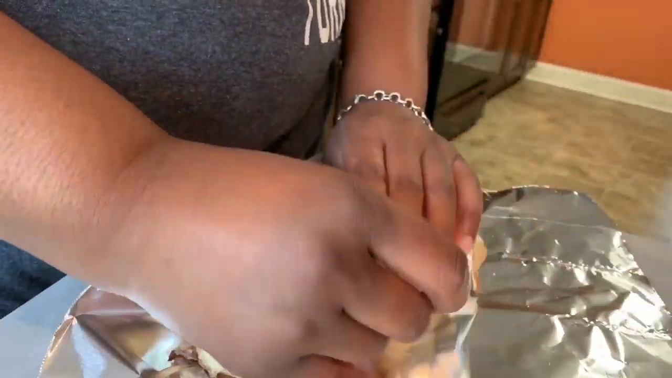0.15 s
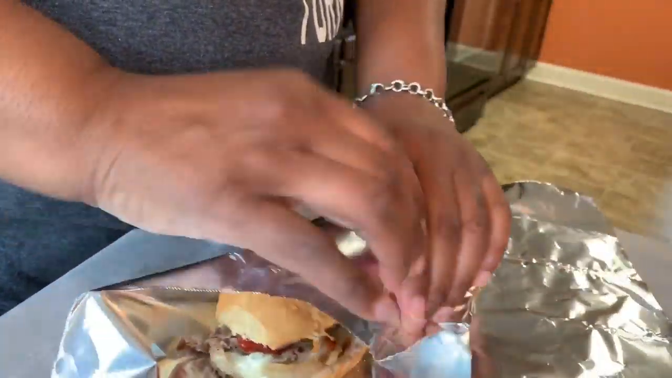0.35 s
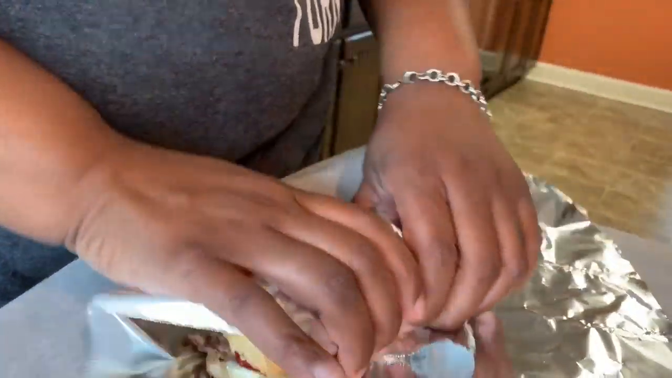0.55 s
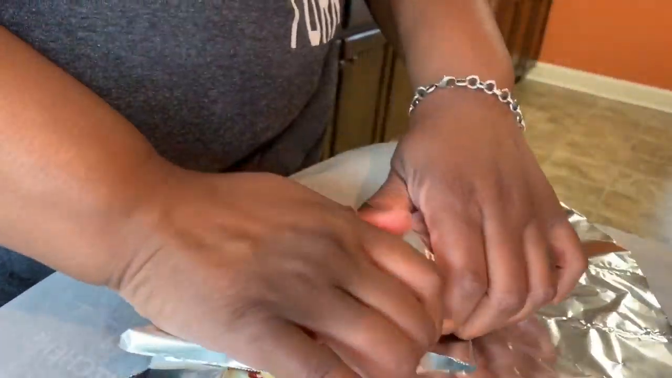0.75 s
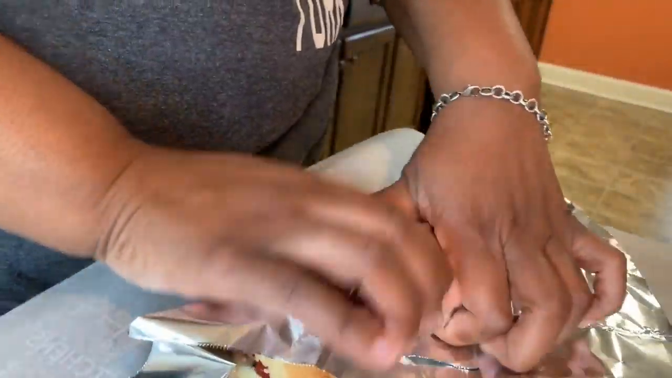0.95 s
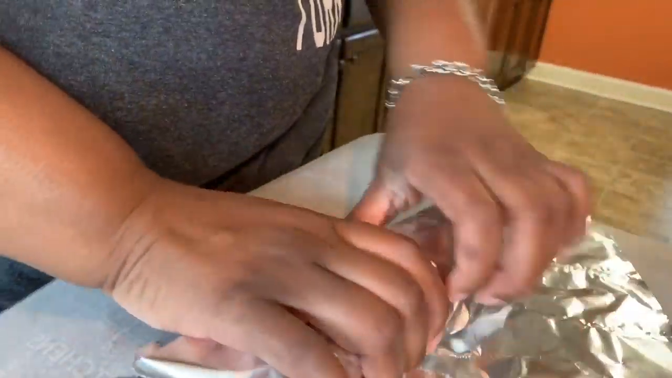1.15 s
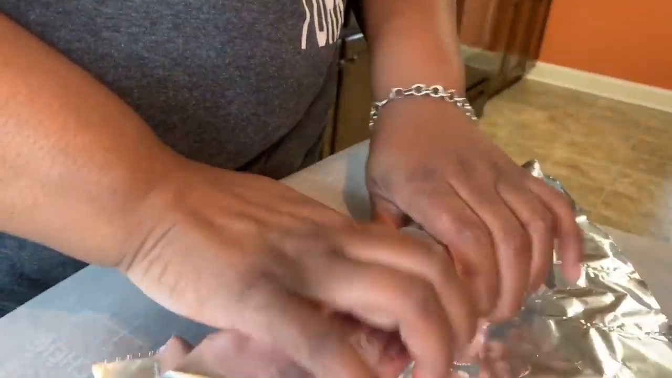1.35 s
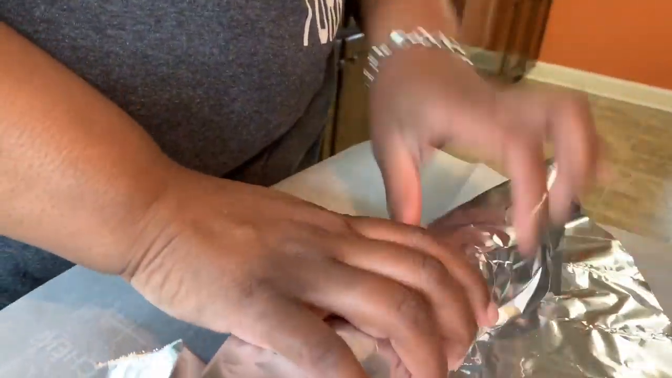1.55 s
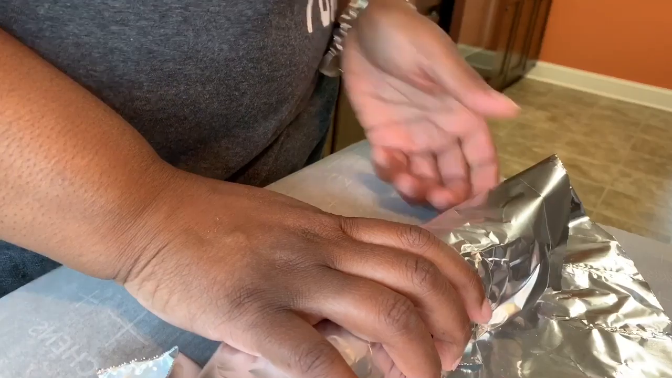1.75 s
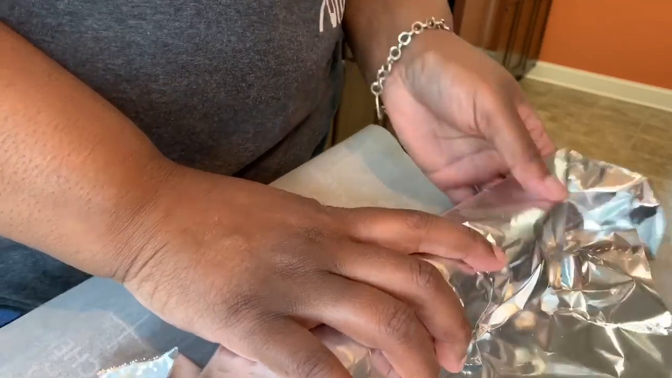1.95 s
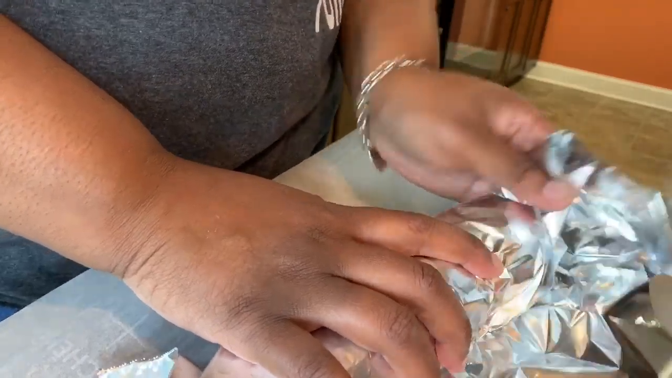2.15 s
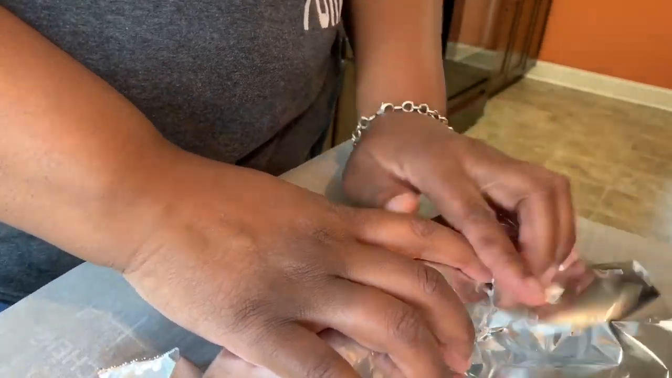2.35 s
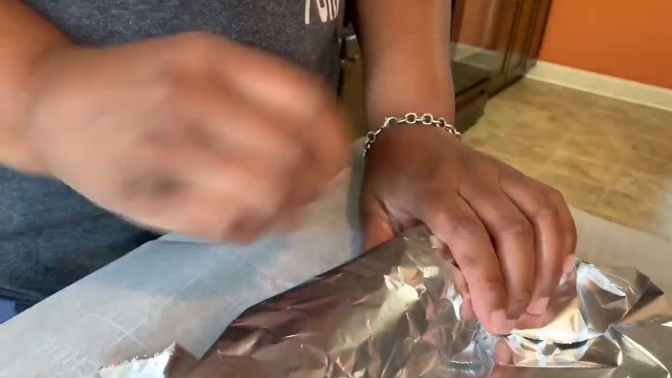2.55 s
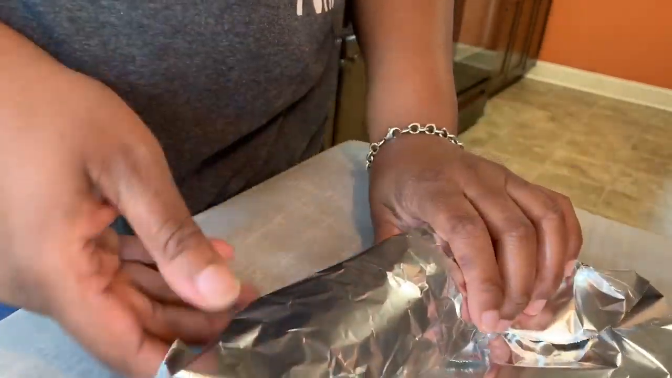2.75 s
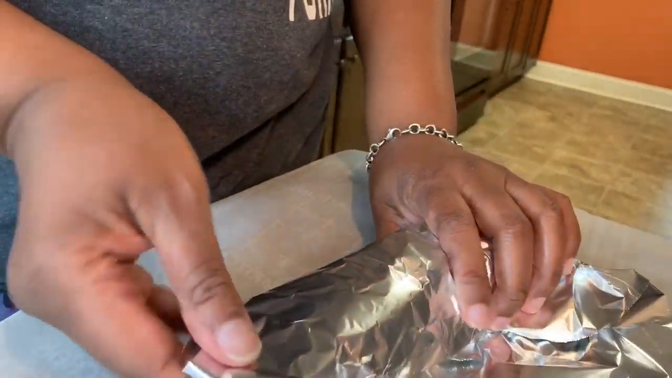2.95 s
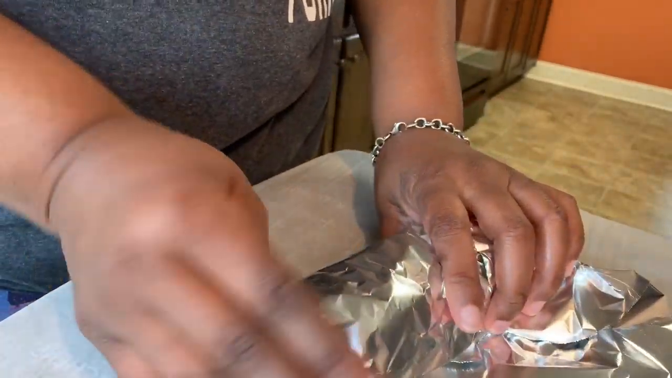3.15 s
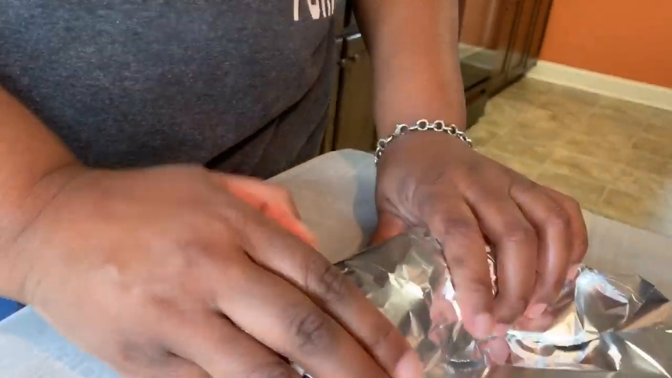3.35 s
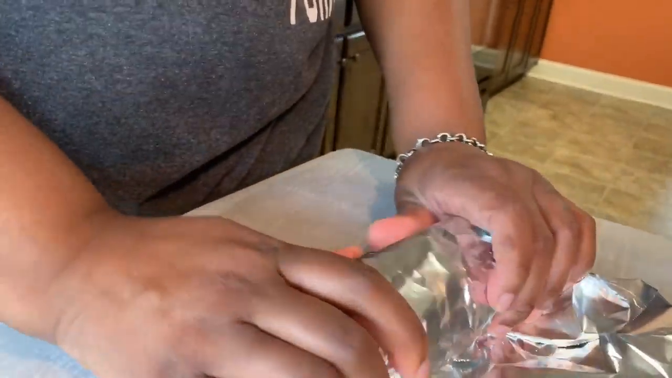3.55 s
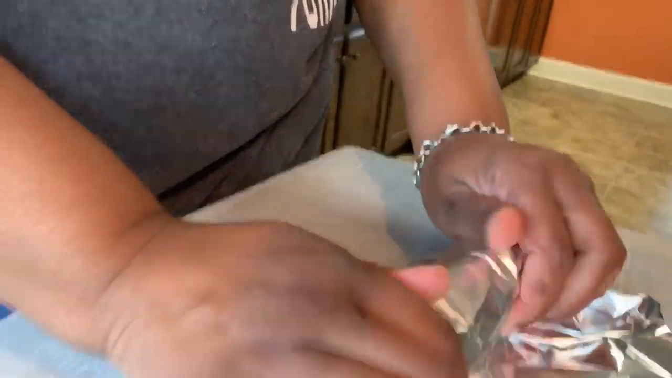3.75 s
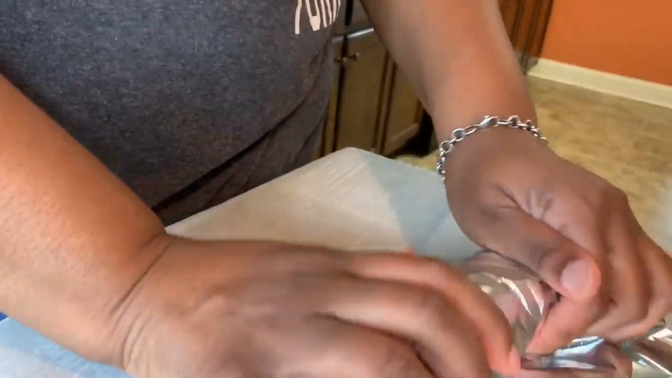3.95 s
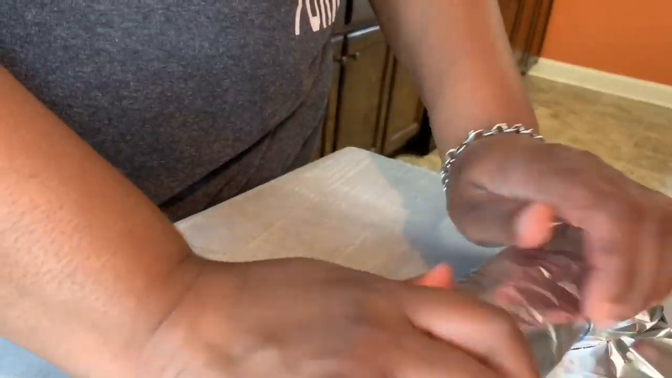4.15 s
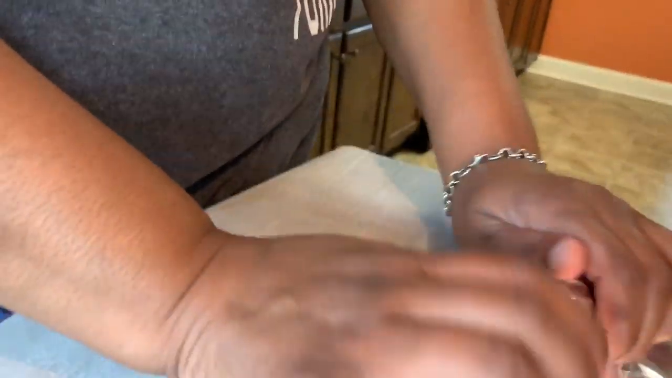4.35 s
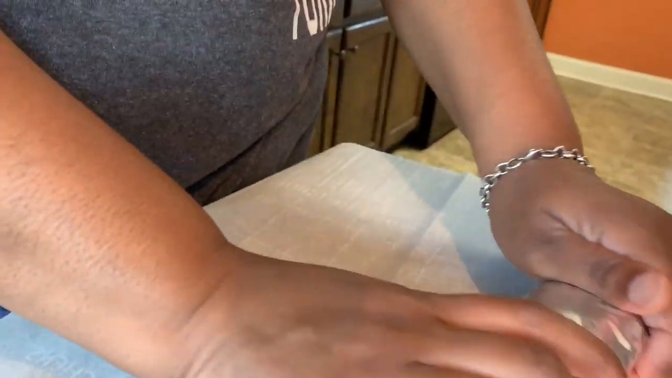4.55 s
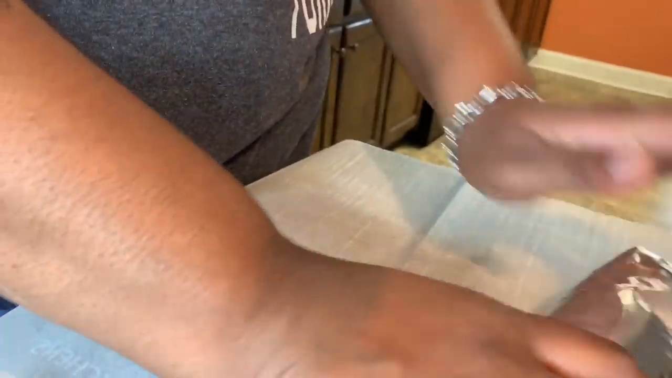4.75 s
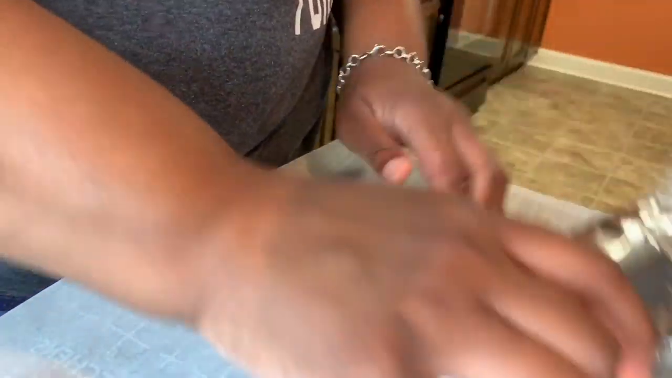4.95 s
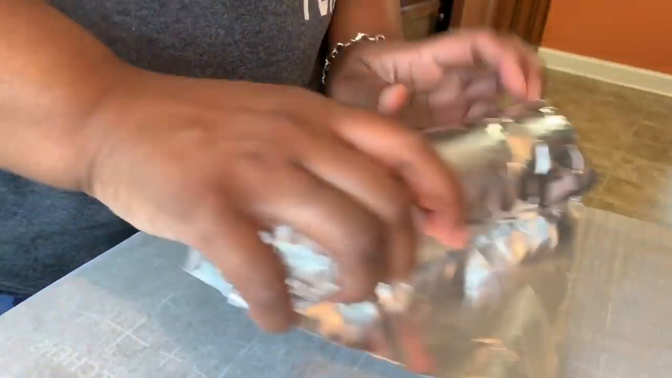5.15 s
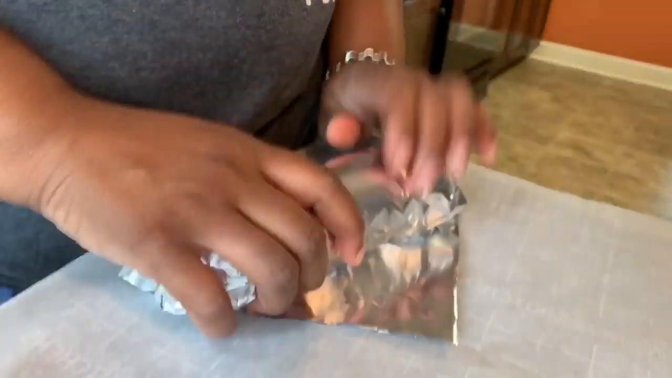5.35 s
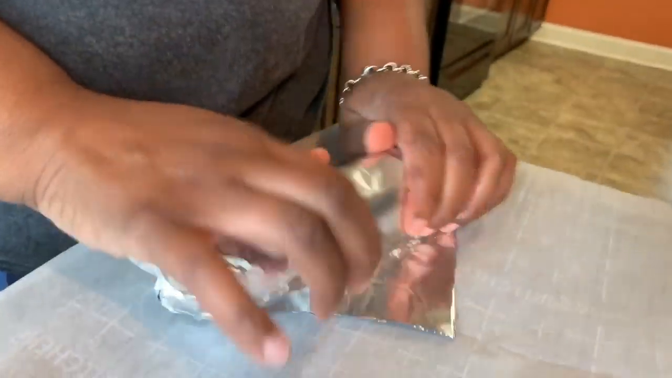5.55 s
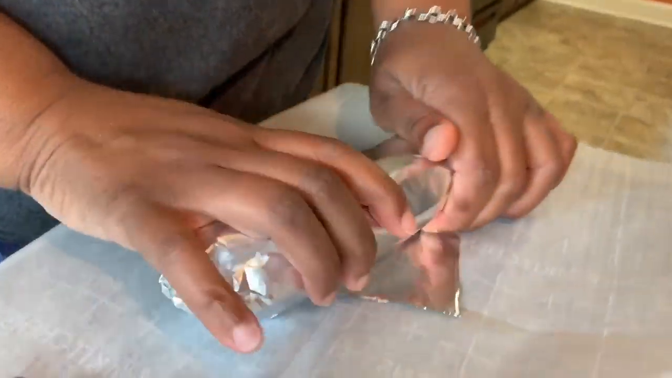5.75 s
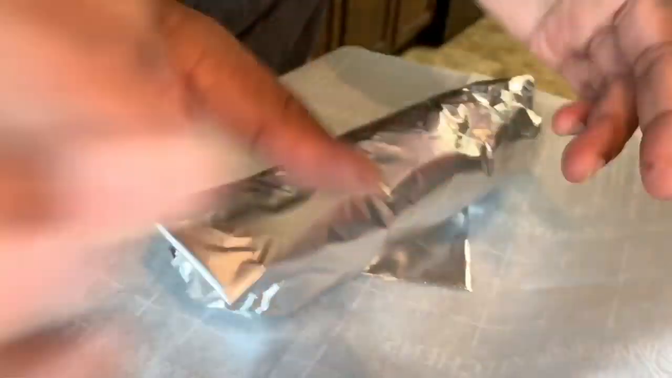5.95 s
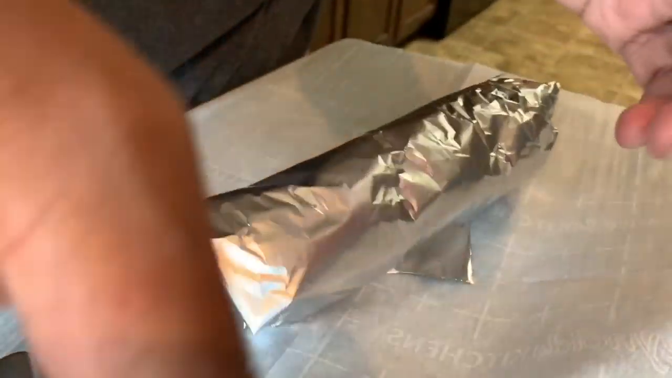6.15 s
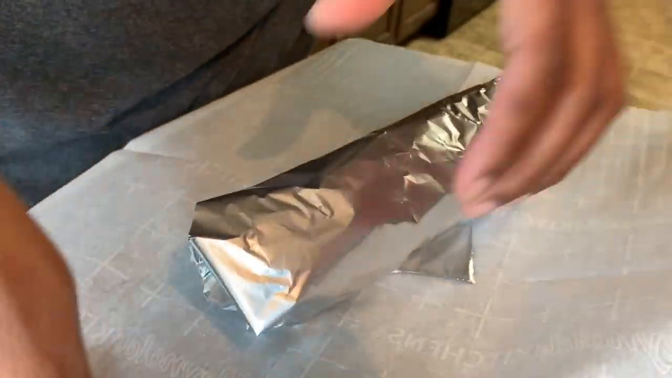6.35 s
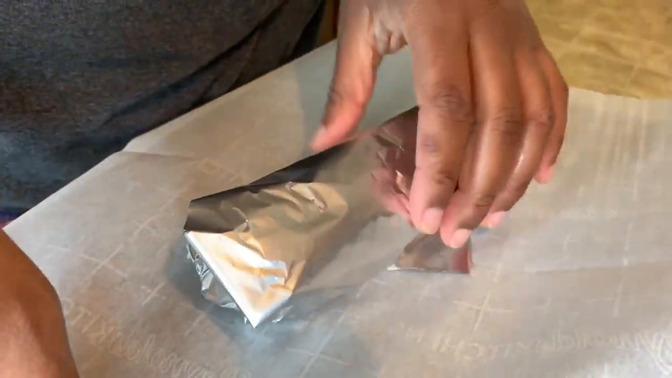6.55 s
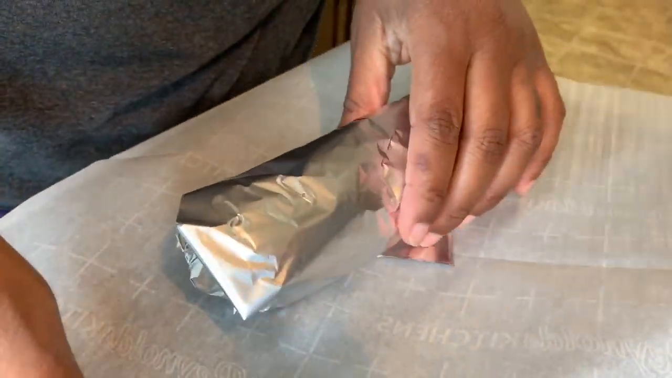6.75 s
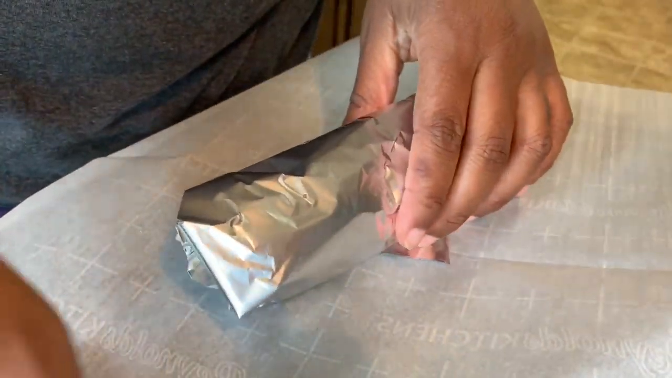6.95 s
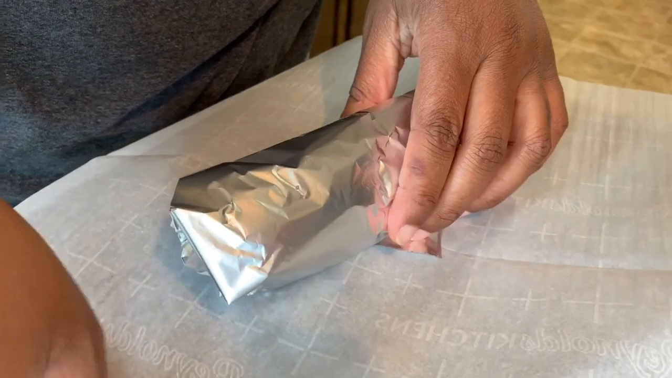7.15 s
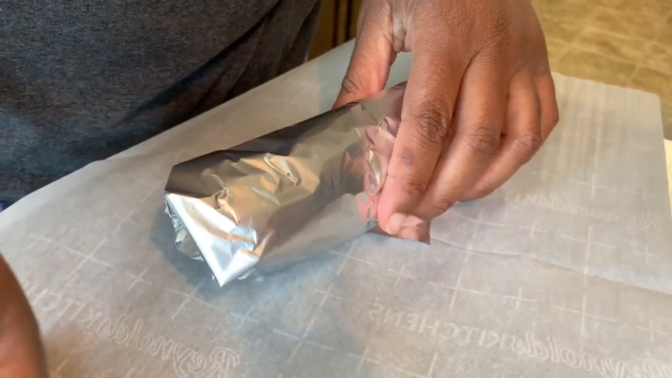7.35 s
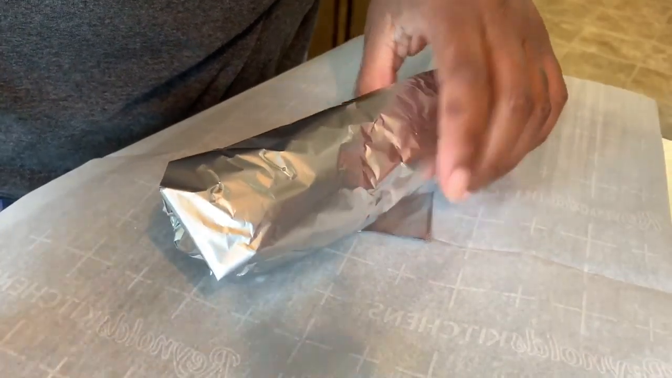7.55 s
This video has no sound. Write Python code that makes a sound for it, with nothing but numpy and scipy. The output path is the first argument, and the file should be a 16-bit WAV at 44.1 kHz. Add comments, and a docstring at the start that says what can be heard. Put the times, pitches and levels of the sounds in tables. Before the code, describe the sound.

Hands fold and press thin aluminium foil around a sandwich on a kitchen counter, heard very close. Dense, bright crackle comes in quick squeezes with sharp snaps and lower pops, plus faint soft bumps. After about six seconds it thins to small ticks, then a wooden knock and rub. A faint appliance hum lies beneath.

```python
"""A kitchen counter in a quiet room: hands fold and press thin metal foil round a sandwich, close to a phone.
Noise bursts ring small patches of foil as snaps and low pops, over a clumped crackle of tiny creases.
The parcel bumps the counter in short low waves, and near the end a wooden panel is rubbed and knocked,
its ringing tones driven by noise. An appliance hums, still air is shaped noise, and the kitchen echoes."""
import sys
import numpy as np
from scipy import signal
from scipy.fft import rfft, irfft
from scipy.io import wavfile
from scipy.ndimage import uniform_filter1d

SR = 44100
rng = np.random.default_rng(int(sys.argv[2]) if len(sys.argv) > 2 else 0)


def volts_from_db(level):
    """Convert decibel levels to linear amplitude ratios."""
    exponent = np.asarray(level, float) / 20
    return 10 ** exponent


def master(y):
    """Save y as 16-bit WAV."""
    cut = np.clip(np.atleast_2d(y).T, -1, 1)
    pcm = np.round(cut * 32767)  # scale
    wavfile.write(sys.argv[1], SR, pcm.astype(np.int16))


N = 334727  # length in samples


def evened(x):
    """Scales a sound to an rms of 1."""
    return x / np.sqrt(np.mean(x ** 2) + 1e-20)


def read(points, hz):
    """Reads a table between its points, on a log-frequency axis."""
    table_hz, value = np.transpose(points)
    return np.interp(np.log(hz + 1), np.log(table_hz + 1), value)


def add(mix, s, sound):
    """Lays a sound into the mix at time s, cutting it at the end of the mix."""
    part = mix[round(s * SR):][:len(sound)]
    part += sound[:len(part)]


def coloured(x, points):
    """Gives a sound the listed spectrum, with a filter that never sounds ahead of its input."""
    hz = abs(np.fft.fftfreq(4096, 1 / SR))
    log_gain = np.log(volts_from_db(read(points, hz)))
    # the Hilbert transform finds the phase that puts the response as early as possible
    spectrum = np.exp(np.conj(signal.hilbert(log_gain)))
    taps = np.fft.ifft(spectrum).real[:2048]
    return signal.oaconvolve(x, taps)[:len(x)]


def ring(x, hz, width):
    """A two-pole resonance of peak gain 1; a narrower width [Hz] rings longer."""
    r = np.exp(-np.pi * width / SR)
    poles = [1, -2 * r * np.cos(2 * np.pi * hz / SR), r * r]
    return (1 - r * r) / 2 * signal.lfilter([1, 0, -1], poles, x)


def above(x, edge_hz):
    """The part of x over a soft edge about an octave wide; the rest is x minus this."""
    hz = np.fft.rfftfreq(len(x), 1 / SR)
    return irfft(rfft(x) / (1 + (edge_hz / (hz + 1)) ** 6), len(x))


def room_tone():
    """Still air is noise with a fixed colour; the wavering hum is noise through narrow resonances."""
    # colour of the still air: (frequency [Hz], relative level per Hz [dB])
    air_colour = [(18, -46), (30, -3.5), (250, 1), (382, -4.5), (600, -17), (1000, -19), (2400, -36),
                  (4800, -25), (8300, -29), (15800, -38)]
    # tones of the appliance: (frequency [Hz], width [Hz], level [dB])
    hum_tones = [(187.3, 3.4, -60), (134.7, 20, -64), (299, 9.1, -71)]
    air = volts_from_db(-56.5) * evened(coloured(rng.standard_normal(N), air_colour))
    hum = sum(volts_from_db(db) * evened(ring(rng.standard_normal(N), hz, width)) for hz, width, db in hum_tones)
    return air + hum


def effort():
    """Crumpling strength over time, for middle, large and smallest facets; powers of all squeezes add up."""
    # foil settling between squeezes:
    # (time [s], level [dB], large facets over it [dB], smallest facets over it [dB])
    settling = [(0, -36, -1.5, -11), (.45, -41, 1.5, -10), (1.2, -39.5, 1.5, -7), (1.66, -35.5, -4.5, -10),
                (1.77, -47.5, -2, -5), (2.0, -35, 1.5, -8), (2.7, -37.5, -5.5, -10), (3.4, -38.5, -4, -12),
                (4.9, -38, -4.5, -12), (5.06, -56, -4, -16), (5.13, -54, -3, -16), (5.3, -53, -4, -12),
                (5.9, -46, -2, -10), (6.1, -51.5, 0, -14), (6.25, -53.5, 1, -10), (6.4, -66.5, -1, -14),
                (6.55, -49.5, -3, -2), (6.8, -51, -2, -17), (6.97, -52, 2.5, -16), (7.05, -58, 2.5, -16),
                (7.3, -49, 2.5, -18), (7.59, -53, -4, -12)]
    # squeezes of the hands:
    # (time [s], hold [s], level [dB], large facets over it [dB], smallest facets over it [dB])
    squeezes = [(0, 0.015, -35, -10, -10), (0.084, 0.087, -27, -2.5, -2), (0.183, 0.04, -34, -0.5, -7),
                (0.233, 0.053, -22.5, -7, -2), (0.316, 0.061, -32.5, -9, -6), (0.391, 0.026, -29, -7, -10),
                (0.469, 0.033, -27.5, -9, -1), (0.536, 0.075, -24.5, -7.5, -5),
                (0.606, 0.13, -29.5, -8, -7), (0.743, 0.056, -31, -8, -8), (0.83, 0.071, -34.5, -5.5, -12),
                (0.905, 0.11, -30.5, -13, -6), (1.025, 0.038, -28, -21, -7), (1.072, 0.035, -26, -16, -9),
                (1.15, 0.054, -25, -17, -6), (1.246, 0.041, -29, -3.5, -7), (1.303, 0.043, -32, -8, -9),
                (1.369, 0.091, -30, -8, -8), (1.577, 0.085, -37, -6.5, -4), (1.784, 0.038, -37, 4, -13),
                (1.839, 0.092, -25.5, -7.5, -5), (1.977, 0.062, -34, -4.5, -9), (2.037, 0.1, -22, -9, -11),
                (2.167, 0.11, -23.5, -3, -4), (2.267, 0.096, -21, -11, -7), (2.402, 0.085, -22.5, -14, -11),
                (2.488, 0.14, -29.5, -12.5, -16), (2.736, 0.061, -32, -13, -7),
                (2.804, 0.095, -26.5, -10.5, -6), (2.898, 0.087, -20.5, -16.5, -10),
                (2.992, 0.063, -29.5, -8, -3), (3.09, 0.057, -30, -8.5, -7), (3.165, 0.11, -20, -16, -11),
                (3.29, 0.035, -20.5, -14, -8), (3.421, 0.084, -21.5, -16.5, -8),
                (3.502, 0.098, -25.5, -7.5, -9), (3.628, 0.11, -23.5, -11, -8),
                (3.731, 0.047, -19, -16.5, -1), (3.797, 0.042, -25.5, -9, -14),
                (3.851, 0.13, -24.5, -13.5, -5), (4.005, 0.057, -24.5, -12, -6),
                (4.062, 0.088, -22, -13, -11), (4.211, 0.14, -24.5, -9.5, -11),
                (4.385, 0.06, -27, -7.5, -3), (4.453, 0.05, -25, -5, -8), (4.534, 0.14, -27, -6, -7),
                (4.708, 0.065, -32, -8, -5), (4.807, 0.11, -32, -11, -9), (4.882, 0.1, -30, -25, -13),
                (4.983, 0.026, -31.5, -1.5, -20), (5.14, 0.048, -24, -13, -8),
                (5.208, 0.053, -35.5, -13, -8), (5.311, 0.028, -24, -8, -9), (5.344, 0.026, -21, -7.5, 1),
                (5.42, 0.065, -32, -1.5, -3), (5.499, 0.11, -33, -5.5, -2), (5.594, 0.11, -33.5, -6.5, -7),
                (5.674, 0.08, -27.5, -4, -11), (5.8, 0.07, -30, -4, -7), (5.892, 0.027, -42.5, 2.5, -11),
                (6.595, 0.062, -40, 3.5, -8), (6.653, 0.047, -34, -2.5, -19), (6.734, 0.027, -43, -1, -9),
                (7.073, 0.018, -53, 10, -16), (7.117, 0.045, -41.5, -4, -11), (7.206, 0.049, -39, -7, -19),
                (7.3, 0.038, -41, -3.5, -13), (7.435, 0.041, -45, 2, -8)]
    # the foil springs back: fall of (middle, large, smallest) facets [dB per s]
    falls = [290, 257, 400]
    grip_s = 0.021  # a squeeze closes quickly
    t = np.arange(N) / SR
    s, db, large_db, tiny_db = np.transpose(settling)
    levels = (db, db + large_db, db + tiny_db)
    power = np.array([volts_from_db(2 * np.interp(t, s, level_db)) for level_db in levels])
    for start, hold, db, large_db, tiny_db in squeezes:
        u = np.arange(0, hold + 0.3, 1 / SR)
        closing = np.minimum(u / grip_s, 1) ** 2
        since_release = np.maximum(u - hold, 0)
        for part, part_db, fall in zip(power, (db, db + large_db, db + tiny_db), falls):
            add(part, start, closing * volts_from_db(2 * (part_db - fall * since_release)))
    return np.sqrt(power)


def crackle():
    """Thousands of tiny creases a second, in clumps that swell and die away."""
    # colour of the crackle: (frequency [Hz], relative level per Hz [dB])
    foil_colour = [(120, -13), (250, -2), (500, 0), (900, -2), (1500, 0), (2500, 0.5), (4000, 1),
                   (5500, 1.5), (8300, -1.5), (11000, -5.5), (15500, -2)]
    starts = (rng.random(N) < 90 / SR) * volts_from_db(5.2 * np.minimum(rng.exponential(1, N), 4))
    # one buckle sets off its neighbours
    spread = signal.lfilter([1], [1, -np.exp(-1 / (0.0025 * SR))], starts)
    clumps = 2.3 + uniform_filter1d(spread, 120)
    sizes = volts_from_db(2.2 * np.minimum(rng.exponential(1, N), 5)) * (rng.random(N) < 5000 / SR) * clumps
    kind, out = rng.integers(0, 10, N), np.zeros(N)
    for k, hz in enumerate(np.geomspace(900, 13000, num=10)):
        envelope = signal.lfilter([1], [1, -np.exp(-1 / (0.0015 * SR))], sizes * (kind == k))
        rattle = rng.standard_normal(N) * envelope
        out += rattle + volts_from_db(6.5) * ring(rattle, hz, 0.81 * hz)  # each size of facet favours its own pitch
    out = coloured(out, foil_colour)
    out /= np.sqrt(uniform_filter1d(out ** 2, 9000) + 1e-12)  # the hand's effort sets the slow level
    # the smaller the facet, the higher its part of the sound
    smallest, upper = above(out, 11700), above(out, 3970)
    bands = [evened(upper - smallest), evened(out - upper), evened(smallest)]
    return (effort() * bands).sum(0)


def kitchen(x):
    """Sparse echoes of random sign, each band dying at its own speed; moving hands keep changing the paths."""
    # echo decay: (frequency [Hz], time to fall by 60 dB [s])
    echo_decay = [(300, 1), (1500, 0.29), (5000, 0.13), (14000, 0.24)]
    out, turn = np.zeros(N), np.arange(N) / SR * 8.2  # radians
    at = np.arange(80, SR // 2 - 20, 20)
    for k in range(3):  # three echo patterns, faded in and out against each other
        taps = np.zeros(SR // 2)
        taps[at + rng.integers(0, 20, len(at))] = rng.choice([-1., 1.], len(at))
        hz, t, bands = signal.stft(taps, SR, nperseg=256)
        fading = volts_from_db(-60 * t / read(echo_decay, hz)[:, None])
        tail = signal.istft(bands * fading, SR, nperseg=256)[1]
        share = np.sqrt(2 / 3) * np.cos(turn + k * np.pi / 3)
        out += signal.fftconvolve(x * share, tail / np.linalg.norm(tail))[:N]
    return out


def facet(noise, hz, edge_db, t60, damping):
    """One crease flips: a dying rattle that rings the facet, with a broad sharp edge; its peak is 1."""
    flip_db, flip_s = 5, 0.0001  # the first flip: height over the rattle, time to its peak
    t = np.arange(len(noise)) / SR
    rattle = noise * (1 - np.exp(-t / 0.000077)) * volts_from_db(-60 * t / t60)
    rattle = rattle + volts_from_db(flip_db) * np.e * t / flip_s * np.exp(-t / flip_s)
    body = ring(ring(rattle, hz, damping * hz), hz, 3.0 * damping * hz)  # twice, for steep skirts
    edge = ring(rattle, 3100, 18000)  # the sheet radiates best in the lower treble
    sound = body / abs(body).max() + volts_from_db(edge_db) * edge / abs(edge).max()
    return sound / abs(sound).max()


def snaps():
    """The creases that stand out: each buckles suddenly and rings its own facet."""
    # buckling creases:
    # (time [s], level [dB], ring of the facet [Hz], sharp edge over the ring [dB], rattle's 60 dB fall [s])
    creases = [(0.0182, -15.5, 2040, 2, 0.028), (0.1214, -9, 4500, 5, 0.07), (0.2327, -14, 7340, 7, 0.0318),
               (0.2834, -7.5, 4820, 15, 0.023), (0.321, -8.9, 4740, 7.5, 0.014),
               (0.341, -11, 4770, 6, 0.015), (0.3676, -17, 8960, 2, 0.0289),
               (0.3993, -14.5, 10900, 1, 0.0193), (0.4095, -19, 3260, 9, 0.039),
               (0.417, -12.5, 8700, 1, 0.0177), (0.4746, -12.5, 8010, -0.5, 0.04),
               (0.5424, -14, 5470, 16, 0.045), (0.6854, -11.5, 2710, 3, 0.01),
               (0.704, -13, 5120, 4, 0.0126), (0.7642, -12.5, 5990, 6, 0.029),
               (0.8032, -18, 4780, -2, 0.011), (0.8402, -13, 5430, 4, 0.0237),
               (0.8652, -11, 5730, 21, 0.016), (0.9309, -16, 1410, 11, 0.045),
               (0.9429, -16, 6070, 5, 0.025), (0.9669, -16.5, 7360, 2, 0.014),
               (1.0426, -7.5, 7320, 5.5, 0.0239), (1.095, -9, 6300, 5, 0.051), (1.154, -22, 4650, 9, 0.045),
               (1.1588, -7.5, 3130, 15, 0.013), (1.2488, -13.5, 6500, 2, 0.034),
               (1.3094, -13.6, 2840, 9, 0.0226), (1.3537, -16, 3320, 9, 0.0122),
               (1.3903, -18, 3250, 6, 0.025), (1.4378, -10.5, 8310, 8, 0.028),
               (1.462, -31, 4350, 17, 0.045), (1.469, -4, 7540, 12, 0.03), (1.4961, -15.9, 8230, 5, 0.0148),
               (1.5062, -15.6, 2970, 7, 0.0098), (1.5732, -6.5, 7190, 8, 0.035),
               (1.5807, -11.5, 1400, 8, 0.025), (1.6062, -3.9, 7160, -10, 0.019),
               (1.6242, -12, 6890, 5, 0.017), (1.6405, -8.5, 9090, -12, 0.0053),
               (1.7777, -19, 2960, 2, 0.045), (1.792, -15.5, 11500, 9, 0.012),
               (1.8224, -10.5, 7450, 11, 0.0202), (1.8593, -9.5, 5640, 13, 0.039),
               (1.9569, -19, 3320, 10, 0.039), (1.9852, -16, 5970, 0, 0.05),
               (2.0087, -16, 6720, -6, 0.0191), (2.0195, -22, 5990, -3, 0.045),
               (2.0467, -19, 5680, 9, 0.04), (2.0672, -12, 7900, -5, 0.045), (2.0881, -6, 7000, -14, 0.011),
               (2.114, -21, 6680, -3, 0.04), (2.1787, -9, 3790, 7, 0.025), (2.3124, -10.5, 2930, 14, 0.049),
               (2.3522, -3.8, 5440, 2, 0.0397), (2.3788, -11.1, 6630, -6, 0.04),
               (2.4081, -13.5, 5640, 6, 0.055), (2.479, -18, 5000, -4, 0.045),
               (2.5695, -23, 6890, 6, 0.051), (2.665, -18.5, 8140, 10, 0.055),
               (2.6852, -19.5, 6340, 0, 0.022), (2.7494, -14.5, 3920, 13, 0.0308),
               (2.795, -12.5, 5680, 9, 0.061), (2.8048, -5.5, 5340, 4, 0.068),
               (2.8632, -12, 2760, -10, 0.0085), (2.924, -13, 8000, -9, 0.045),
               (2.9952, -17.5, 5260, 1, 0.045), (3.0213, -10.8, 7970, 5, 0.0166),
               (3.0362, -15, 5680, 9, 0.045), (3.052, -13.8, 6890, 5, 0.0126),
               (3.0656, -15, 8480, 5, 0.0273), (3.0774, -6.5, 8800, 3, 0.0092),
               (3.083, -18, 8100, 0, 0.011), (3.0996, -8, 6120, 13, 0.013), (3.1066, -10, 4950, 10, 0.031),
               (3.1459, -12.5, 2540, -2, 0.011), (3.177, -14, 5210, 3, 0.045), (3.296, -8, 5300, 7, 0.068),
               (3.383, -18.2, 5380, 4, 0.045), (3.4298, -10.5, 5810, 14, 0.0378),
               (3.4411, -13, 5600, 0, 0.077), (3.495, -18, 5250, 5, 0.045), (3.5371, -13, 4950, 9, 0.015),
               (3.5585, -11, 4950, 2, 0.051), (3.5759, -7.5, 6420, 11, 0.02), (3.5856, -7, 6030, 1, 0.0167),
               (3.6334, -5, 9800, 20, 0.0253), (3.661, -11, 6720, 2, 0.045), (3.6839, -6, 5340, 9, 0.017),
               (3.7462, -6.5, 5000, 9, 0.057), (3.768, -7.5, 5680, 4, 0.045), (3.7774, -7, 8960, -4, 0.013),
               (3.8199, -14, 5470, -4, 0.035), (3.8364, -12, 6630, -1, 0.0166),
               (3.947, -10, 5870, 10, 0.057), (3.9637, -15, 5810, 13, 0.041),
               (3.9963, -15.5, 2800, 1, 0.054), (4.0152, -9.5, 9500, 6, 0.045),
               (4.023, -8.5, 5170, 9, 0.026), (4.0469, -14, 6240, 3, 0.045),
               (4.1934, -8.5, 9170, 10, 0.007), (4.209, -15, 10590, 18, 0.045),
               (4.3336, -10.5, 4780, -7, 0.019), (4.3625, -8.5, 5940, -4, 0.014),
               (4.3997, -10, 6240, 5, 0.049), (4.4686, -13, 6370, 13, 0.0313), (4.49, -9, 9000, 8, 0.035),
               (4.505, -13, 8570, -1, 0.021), (4.5175, -17, 9300, 1, 0.0136),
               (4.529, -12.2, 4950, -8, 0.0143), (4.5605, -5.5, 3300, 3, 0.018),
               (4.6339, -12, 7620, 2, 0.034), (4.6422, -4.5, 7640, -4, 0.0063),
               (4.647, -12, 7410, 4, 0.011), (4.6729, -14, 8530, 7, 0.015), (4.6852, -18, 4820, -3, 0.0084),
               (4.699, -6.5, 5040, -3, 0.0066), (4.7035, -12, 5340, 4, 0.022),
               (4.7147, -13, 4610, 2, 0.0231), (4.7397, -11, 3570, -4, 0.0109),
               (4.7487, -9.5, 4780, 10, 0.0096), (4.755, -15, 4310, 9, 0.0131),
               (4.767, -17, 7060, 8.5, 0.037), (4.8097, -23, 8140, 6, 0.015),
               (4.8161, -15.5, 3490, 11, 0.0203), (4.9354, -21, 8400, -10, 0.0281),
               (5.0283, -15, 4300, -10, 0.0105), (5.0519, -30, 8000, 0, 0.0256),
               (5.1435, -33, 8870, 3, 0.021), (5.1514, -21, 5060, 9, 0.023), (5.2695, -21, 6590, 4, 0.0191),
               (5.4355, -9.5, 3080, 2, 0.025), (5.4409, -11, 6460, 6, 0.045), (5.467, -26, 5170, 6, 0.037),
               (5.5167, -16.6, 6550, 19, 0.035), (5.5236, -15, 4040, 7, 0.0135),
               (5.5317, -13, 4440, 11, 0.0338), (5.5512, -12, 10550, 5, 0.0079),
               (5.572, -15.1, 4660, 14, 0.021), (5.6302, -16, 6800, -2, 0.02),
               (5.6488, -21, 5000, 5, 0.016), (5.7064, -8, 8050, 11, 0.045),
               (5.7324, -2.5, 5340, 13, 0.015), (5.7408, -8.0, 8270, 1, 0.018),
               (5.7494, -18, 5640, 3, 0.0197), (5.7895, -17.1, 4350, 14, 0.045),
               (5.818, -10, 4500, 4, 0.0213), (5.8362, -13, 5700, -12, 0.039),
               (5.8451, -13, 8480, -8, 0.038), (5.905, -10.5, 5050, 13, 0.019),
               (5.9396, -10, 5210, 8, 0.0072), (5.9547, -15.7, 4400, 7, 0.0081),
               (5.9637, -17, 7490, 1, 0.012), (5.9851, -13.6, 8100, 7, 0.0084),
               (5.9979, -14, 5250, 6, 0.02), (6.0067, -24, 5560, -1, 0.0084),
               (6.0254, -15, 10510, 15, 0.011), (6.0421, -27.1, 1697, 4, 0.0099),
               (6.0553, -14, 6100, 11, 0.0075), (6.0727, -23, 5250, 6, 0.0098),
               (6.0969, -27, 1810, 0, 0.0084), (6.1071, -32, 5340, 7, 0.0222),
               (6.1134, -21.5, 4880, 9, 0.0087), (6.1365, -26, 6500, 12, 0.0083),
               (6.148, -29, 9040, -5, 0.0085), (6.1696, -27.4, 5170, 7, 0.045),
               (6.1742, -14, 3200, 15, 0.0196), (6.2188, -24.5, 4900, 2, 0.0117),
               (6.236, -29, 1800, 5, 0.008), (6.2522, -34, 4010, 6, 0.0092),
               (6.2672, -19.5, 5260, 10, 0.0093), (6.2809, -12, 6400, 0, 0.016),
               (6.3799, -34.5, 5080, -1, 0.0125), (6.4157, -45, 4180, -4, 0.0126),
               (6.4477, -51, 5470, 10, 0.0379), (6.4609, -33.1, 8610, 17, 0.11),
               (6.4935, -18, 8350, 11, 0.016), (6.5275, -14.5, 4200, -2, 0.0081),
               (6.5474, -25.7, 1530, 10, 0.0086), (6.5812, -17, 4500, -1, 0.0065),
               (6.5939, -26, 2540, -5, 0.024), (6.6068, -25.0, 2840, 3, 0.0138),
               (6.6224, -16.5, 2630, -11, 0.0138), (6.6329, -16, 4310, 10, 0.045),
               (6.662, -13, 6890, 14, 0.0099), (6.678, -13, 2930, 10, 0.018), (6.6873, -15, 3020, 1, 0.032),
               (6.702, -10, 2450, 2, 0.015), (6.7398, -20, 5170, 9, 0.0227),
               (6.7523, -15.5, 4360, 8, 0.0397), (6.787, -25, 4910, 12, 0.0122),
               (6.8159, -22, 4520, 3, 0.0066), (6.8393, -19, 4670, -1, 0.0072),
               (6.8471, -23, 8440, 7, 0.0105), (6.8598, -33, 1800, 0, 0.027),
               (6.8727, -43, 2820, 9, 0.0222), (6.8844, -26, 3380, 4, 0.0074),
               (6.9097, -21.5, 4060, 0, 0.0078), (6.9162, -20.5, 1860, 5, 0.0041),
               (6.9362, -30, 2000, 0, 0.0094), (6.9464, -30, 4260, 8, 0.0153),
               (6.959, -32, 3360, 13, 0.016), (7.0934, -18.5, 6100, -20, 0.013),
               (7.0987, -28, 5940, -14, 0.028), (7.1313, -25, 3790, -3, 0.049),
               (7.1372, -19, 3760, -2, 0.027), (7.1711, -29, 4690, -8, 0.0276),
               (7.1982, -24, 3920, 2, 0.016), (7.2685, -23.3, 4950, -9, 0.0176),
               (7.2833, -18, 3190, -14, 0.0155), (7.3075, -21, 9130, 6, 0.0137),
               (7.3335, -17, 8740, 19, 0.0093), (7.3476, -19, 3180, 6, 0.014),
               (7.3814, -23, 1210, -19, 0.05), (7.3906, -17, 7000, 5, 0.007),
               (7.3964, -14.7, 4020, 0, 0.0051), (7.4371, -11, 4570, 9, 0.009),
               (7.4418, -21.5, 5640, -2, 0.0091), (7.4722, -19.5, 8440, 11, 0.0074),
               (7.4851, -26.7, 9560, 3, 0.0218), (7.4911, -19, 2200, 9, 0.0079),
               (7.5151, -15.5, 2160, 8, 0.016), (7.5546, -28.3, 2840, 9, 0.0137),
               (7.5616, -30, 5170, 4, 0.0183), (7.5694, -21, 4870, 0, 0.0093),
               (7.5829, -25, 2540, 12, 0.013)]
    out, noise = np.zeros(N), rng.standard_normal((len(creases), 2500))
    for (s, db, hz, edge_db, t60), row in zip(creases, noise):
        add(out, s, volts_from_db(db) * facet(row, hz, edge_db, t60, damping=0.25))
    return signal.sosfilt(signal.butter(2, 700, "highpass", fs=SR, output="sos"), out)


def strays():
    """Lesser creases at random moments, whose strength follows the crumpling around them."""
    per_s, over_db, spread_db = 45, 8, 0.5  # mean rate; level over the crumpling; spread of sizes
    strength = effort()[0]
    chance, noise = rng.random((600, 5)), rng.standard_normal((600, 1500))
    times, out = np.cumsum(-np.log(1 - chance[:, 0])) / per_s, np.zeros(N)
    times = times[times < N / SR - 0.01]
    for s, (_, size, pitch, edge, length), row in zip(times, chance, noise):
        db = over_db - spread_db * np.log(1.1 - size)
        sound = facet(row, 2500 * 3.6 ** pitch, -2 + 12 * edge, 0.005 * 3.4 ** length, damping=0.35)
        add(out, s, strength[round(s * SR)] * volts_from_db(db) * sound)
    return out


def bumps():
    """Soft things landing on or pushing the counter: two or three low cycles that swell and die."""
    # parcel and fingers bumping or pressing the counter: (time [s], level [dB], frequency [Hz])
    thuds = [(.112, -43, 99.6), (.14, -29, 423), (.63, -39, 109), (1.19, -50, 72), (1.814, -46, 78.1),
             (1.859, -44, 78.1), (2.211, -21.5, 450), (2.258, -35, 92), (2.263, -29, 500),
             (2.843, -35, 410), (3.08, -31.5, 546), (3.275, -44, 91.5), (3.36, -31.5, 450),
             (3.773, -43, 91.5), (4.237, -31.5, 458), (4.299, -49, 78.1), (4.494, -49, 64.6),
             (5.006, -47, 91.5), (5.024, -32, 437), (5.334, -51, 75.4), (5.894, -22.5, 353),
             (5.899, -43, 108), (5.93, -34.5, 240), (5.969, -47, 67.3), (5.977, -27.5, 484),
             (6.046, -31.5, 445), (6.074, -42, 360)]
    out, t = np.zeros(N), np.arange(6000) / SR
    for s, db, hz in thuds:
        swell = np.e * hz * t / 0.56 * np.exp(-hz * t / 0.53)
        add(out, s, volts_from_db(db) * np.sin(2 * np.pi * hz * t) * swell)
    return out


def pops():
    """Broad flat parts of the sheet pop over: a broad, quickly damped low ring with a sharp edge."""
    # flat parts popping over: (time [s], level [dB], frequency [Hz])
    flat_parts = [(0.125, -5.5, 1460), (0.161, -13, 1740), (0.283, -22, 2090), (0.401, -15, 2420),
                  (0.931, -21, 1420), (1.035, -15, 2790), (1.265, -15, 2060), (1.497, -20, 2020),
                  (1.578, -24, 1430), (1.606, -13.5, 2420), (2.178, -9, 1020), (2.21, -14, 740),
                  (2.351, -23, 950), (2.504, -17, 2040), (2.611, -12, 2630), (2.933, -21, 1600),
                  (2.961, -18, 2050), (2.996, -15, 1380), (3.019, -12.5, 2150), (3.25, -13, 1660),
                  (3.359, -14, 2540), (3.568, -15, 2220), (3.623, -17, 1170), (3.663, -9, 2040),
                  (4.013, -12, 1710), (4.399, -14, 2600), (4.467, -13.5, 1900), (4.641, -15, 2030),
                  (4.684, -7.5, 2740), (5.0, -26, 2790), (5.33, -23, 2040), (5.435, -7.5, 1430),
                  (5.998, -20, 1700)]
    out, noise = np.zeros(N), rng.standard_normal((len(flat_parts), 1500))
    for (s, db, hz), row in zip(flat_parts, noise):
        add(out, s, volts_from_db(db) * facet(row, hz, edge_db=0.5, t60=0.011, damping=0.6))
    return out


def panel():
    """Uneven slips and a few blows ring the modes of the wood."""
    # something dragged on the wood: (time [s], rise [s], force level [dB], fade [dB per s])
    rubs = [(7.054, .06, -34.5, 120), (7.375, 0.0068, -34.5, 200)]
    # blows on the wood: (time [s], force level [dB])
    blows = [(7.066, -28), (7.087, -16.5), (7.116, -14), (7.139, -25), (7.38, -23)]
    # ringing tones of the wood: (frequency [Hz], level [dB], ring length setting [s]; width = 1.64 / length)
    wood_modes = [(271, 14, 0.085), (353, 4, 0.022), (463, -2, 0.028), (660, 8, 0.063), (845, -2, 0.15),
                  (1210, -11, 0.093), (1360, -16, 0.061)]
    t = np.arange(N) / SR
    ticks = (rng.random(N) < 900 / SR) * rng.standard_normal(N)
    slips = evened(uniform_filter1d(ticks, size=16))  # soft contact
    force = slips * sum(np.clip((t - s) / rise, 0, 1) * volts_from_db(db - fade * np.maximum(t - s - rise, 0))
                        for s, rise, db, fade in rubs)
    # a blow bounces for a few milliseconds
    chatter = uniform_filter1d(rng.standard_normal((len(blows), 400)), size=10)
    chatter = chatter * np.exp(-np.arange(400) / (0.0028 * SR))
    for (s, db), blow in zip(blows, chatter):
        add(force, s, volts_from_db(db) * blow)
    ringing = sum(volts_from_db(db) * ring(force, hz, 1.64 / length) for hz, db, length in wood_modes)
    return ringing + volts_from_db(-9) * ring(force, 330, 650)  # many faint modes blur into a broad body


def scene():
    """All sources near the phone, the kitchen's echoes of them, and the room tone."""
    near = crackle() + snaps() + strays() + pops() + bumps() + panel()
    return (near + volts_from_db(-18) * kitchen(near) + room_tone())[None]


def low_pass(x):
    """Removes everything above the highest recorded frequency."""
    return signal.sosfilt(signal.butter(12, 16970, fs=SR, output="sos"), x)


def record(dry):
    """The phone thins the bass below 45 Hz and cuts the treble above 15.9 kHz."""
    thinned = signal.sosfilt(signal.butter(2, 45, "highpass", fs=SR, output="sos"), dry)
    treble_cut = signal.firwin(301, 15900, window=("kaiser", 6), fs=SR)
    limited = signal.oaconvolve(thinned, treble_cut[None], "same")
    return low_pass(limited)


dry = scene()
out = record(dry)
master(out)
```